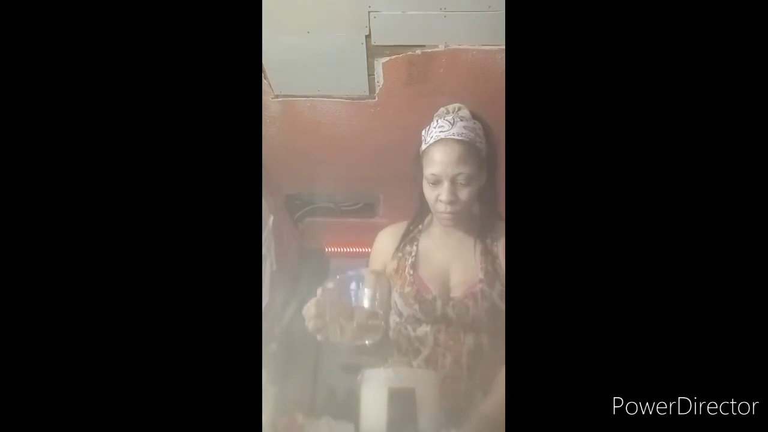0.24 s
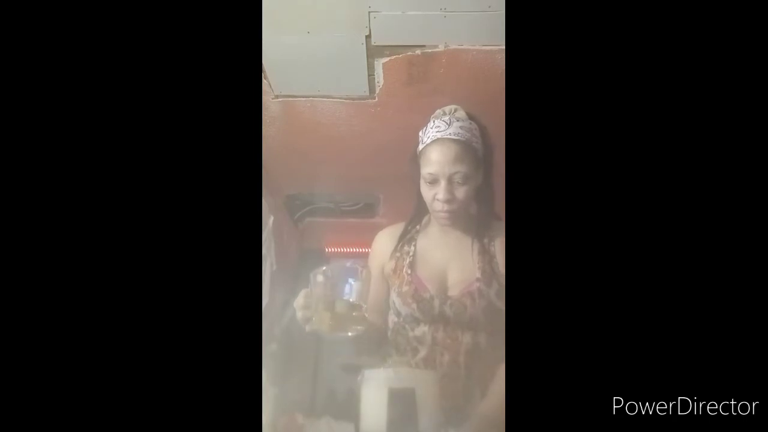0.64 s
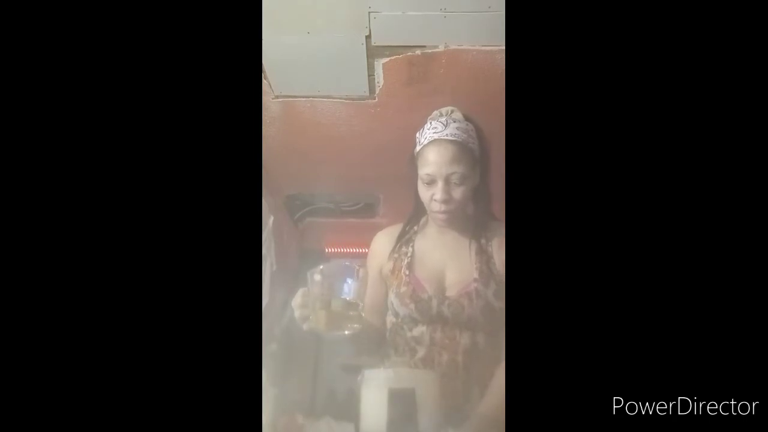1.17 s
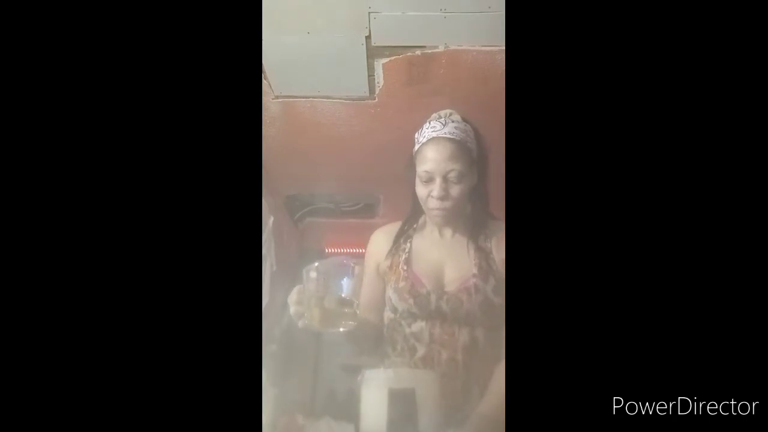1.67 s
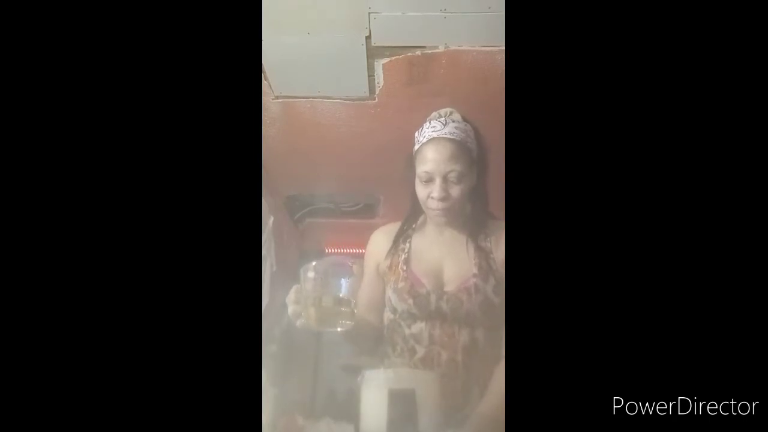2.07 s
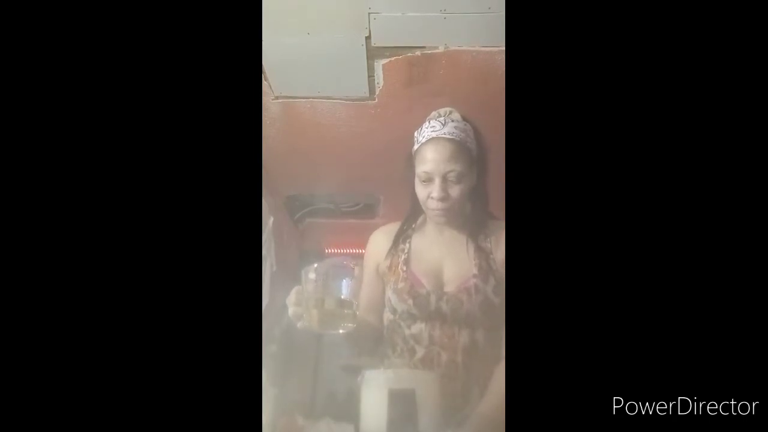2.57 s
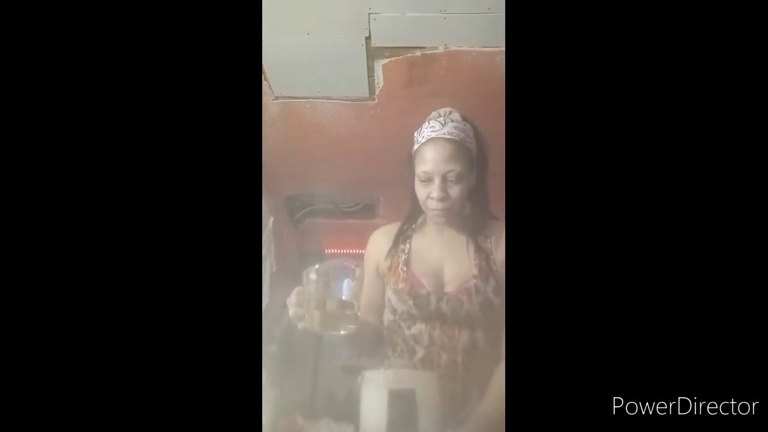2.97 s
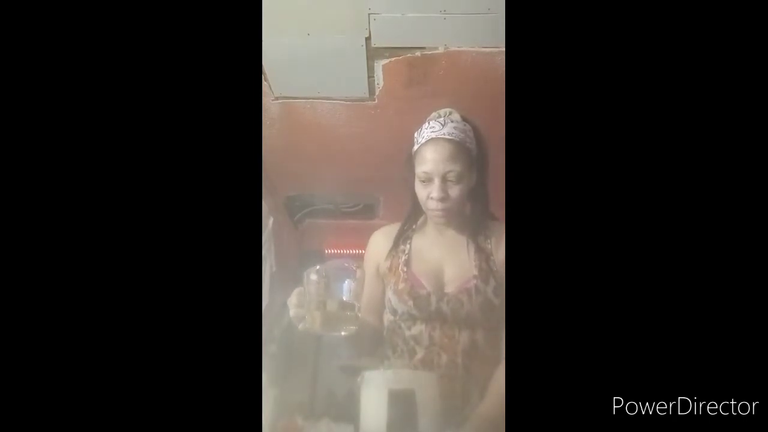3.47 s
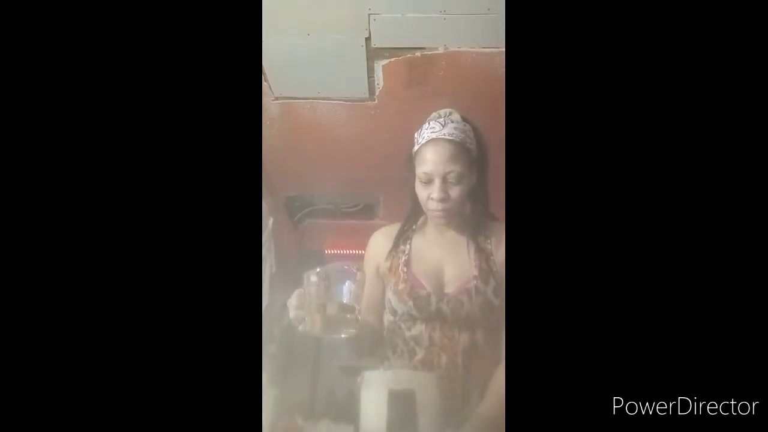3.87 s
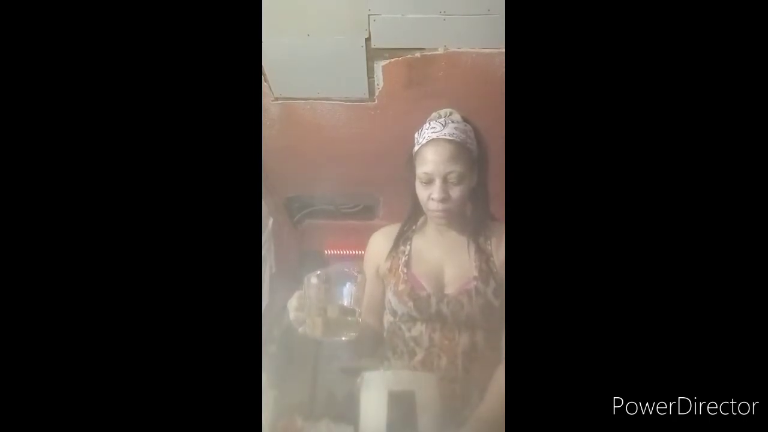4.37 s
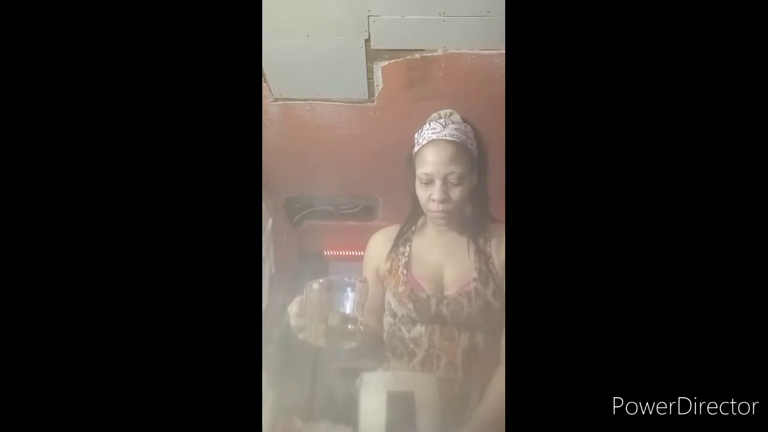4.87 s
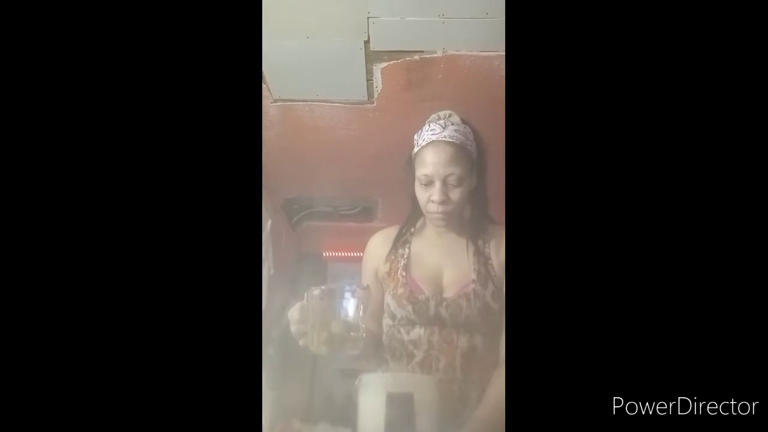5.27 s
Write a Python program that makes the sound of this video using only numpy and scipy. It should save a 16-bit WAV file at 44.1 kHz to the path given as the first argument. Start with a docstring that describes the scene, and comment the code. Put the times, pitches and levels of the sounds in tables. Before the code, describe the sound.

Close, dense kitchen appliance noise: a small electric motor grinding steadily, with a shrill buzzing whine and higher overtones, fast fluttering rattle from the housing and airy brush hiss above. The pitch sags a little under load midway, then climbs back. Little bass, only slight rumble and hum. No start or stop, no audible room echo, compressed phone-like microphone.

```python
"""Kitchen counter: a food processor runs steadily, close by.
Whine: gear tones locked to a mesh pitch that sags as the load rises, each split into mains sidebands.
Noise: coloured, throbbing noise for the housing rattle, the brush and fan hiss and the base rumble.
Low hum: slightly unsteady sines at fixed pitches, mains harmonics and another appliance.
Gain control then evens out the loudness."""
import sys
import numpy as np
from scipy import signal
from scipy.fft import rfft, irfft, next_fast_len
from scipy.io import wavfile
from scipy.ndimage import uniform_filter1d, map_coordinates

SR = 44100
rng = np.random.default_rng(int(sys.argv[2]) if len(sys.argv) > 2 else 0)


def transcribe(u):
    """Save the signal u as a 16-bit wav file named by the first command-line argument.

    u: samples, shape (n,) or (channels, n), limited to [-1, 1]; the rate is SR.
    q: integer samples, one column per channel.
    """
    v = np.clip(np.atleast_2d(u).T, -1, 1)
    q = np.round(v * 32767).astype(np.int16)
    wavfile.write(sys.argv[1], SR, q)


N = 244314
TIME_S = np.arange(N) / SR

# Gear mesh pitch, sagging under load, then recovering: start_s, mesh_hz
MESH_PITCH = [(0, 1934), (.2, 1932), (.45, 1940), (.65, 1936), (.8, 1925), (1, 1922), (1.2, 1912),
              (1.9, 1910), (2.3, 1900), (2.6, 1902), (3.2, 1895), (3.65, 1894.5), (4, 1906), (4.4, 1927),
              (4.8, 1921.5), (5.25, 1930), (5.54, 1926)]
# Gear train tones: mesh_multiple, strongest_sideband (mains steps from the multiple)
GEAR_TONES = [(3 / 41, 0), (.0995, 0), (.1692, 0), (.1745, 0), (.1956, 0), (27 / 41, 0), (33 / 41, 0),
              (.925, 0), (.9302, 0), (39 / 41, 1), (40 / 41, 0), (1, 0), (42 / 41, 0), (1.0701, 0),
              (73 / 41, 0), (1.9006, 0), (80 / 41, 0), (1.9651, 1), (81 / 41, 0), (2.0698, 0), (2.8953, 0),
              (121 / 41, 1), (3.052, 0), (3.8152, 0), (3.9097, 0)]
# Same tones: level_db (re mesh tone), sideband_loss_db (at one step; grows as the step squared)
GEAR_LEVELS = [(-35, 15), (-30, 15), (-26, 15), (-19, 20), (-34, 15), (-30, 8), (-18, 8), (-23, 14),
               (-10, 14), (-9, 1.5), (-19, 12), (0, 11), (-12, 13), (-19, 12), (-21, 10), (-17, 10),
               (-11, 4), (-14, 1.5), (-5.5, 2.2), (-18, 10), (-23, 3), (-21, 8), (-24, 4), (-18, 4),
               (-24, .8)]
# Whine level: start_s, level_db
WHINE_LEVEL = [(0, -21), (.6, -19), (1.2, -20.5), (2.4, -20.5), (3.8, -19.5), (4.2, -20.5), (5.54, -20.5)]
# Motor noise level: start_s, level_db
NOISE_LEVEL = [(0, -17.5), (.4, -17), (1.36, -16), (1.53, -16.5), (1.7, -14.5), (1.87, -16.5), (2.3, -15.5),
               (2.55, -16), (3, -15.5), (3.8, -15), (4.08, -17), (4.25, -15.5), (4.42, -17), (4.59, -14),
               (4.93, -16.5), (5.44, -16.5), (5.54, -15.5)]
# Housing rattle spectrum: pitch_hz, relative_density_db
RATTLE_SPECTRUM = [(650, -61), (1100, -36.5), (1280, -19.5), (1380, -22), (1500, -15.5), (1650, -15.5),
                   (1900, -1), (1970, -16), (2080, -8), (2320, -14.5), (2990, -7.5), (3240, -9),
                   (3830, -4.5), (4280, -15), (5200, -24), (6760, -48), (11400, -120)]
# Brush and fan hiss spectrum: pitch_hz, relative_density_db
HISS_SPECTRUM = [(2940, -29.5), (5000, -17), (5170, -13), (5580, -1), (6170, -8), (7040, 0.5), (7320, -1),
                 (7530, 0), (7860, -10), (8130, -14.5), (8440, -17.5), (9370, -12), (10700, -25),
                 (13200, -9.5), (15600, -21.5)]
# Base rumble spectrum: pitch_hz, relative_density_db
RUMBLE_SPECTRUM = [(12, -62), (20, -41), (87, -18.5), (173, -12), (244, -20.5), (326, -3.5), (401, -11.5),
                   (484, -13), (615, -7), (730, -19.5), (823, -12), (1050, -16.5), (1200, -15.5),
                   (1560, -27), (2640, -120)]
# Narrow peaks and dips of bowl and lid: center_hz, half_width_hz (to 1/e of the dB), gain_db
BOWL_PEAKS = [(1588, 25, -15), (1620, 32, 3.5), (1820, 17, -2), (2032, 21, 4), (2677, 37, -5),
              (3078, 43, 3.5), (3159, 44, -10.5), (3310, 57, 0.5), (4000, 40, 1.5), (4080, 40, 2),
              (4140, 37, -6), (4320, 34, -6), (5070, 60, 2.5), (5520, 30, -0.5), (5675, 43, 2.5),
              (6480, 47, 4.5), (7210, 38, 2), (7650, 39, -0.5), (11120, 340, 4.5), (14300, 300, -7)]
# Low hum, mains harmonics and another appliance: pitch_hz, level_db
LOW_HUM = [(54.5, -61.5), (119.9, -59.5), (163.5, -57), (179.7, -47), (218.0, -57.5), (239.7, -55),
           (299.6, -42), (359.7, -52.5), (419.7, -53)]

MAINS_HZ, TOP_HZ, BASS_CUT_HZ = 59.9, 15490, 33
BLADE_TEETH = 41  # mesh cycles per blade shaft turn
SIDEBANDS = np.arange(-3, 4)  # mains steps from the strongest
HISS_DB, RUMBLE_DB = -3.5, -20.5  # re rattle


def amp(db):
    """Amplitude gain of a level in dB."""
    return 10 ** (np.asarray(db) / 20)


def unit(x):
    """Scale x to rms 1."""
    return x / np.sqrt(np.mean(x ** 2) + 1e-20)


def curve(rows):
    """Interpolate a (start_s, value) table to one value per sample."""
    start_s, value = np.transpose(rows)
    return np.interp(TIME_S, start_s, value)


def wobble(rate_hz):
    """Random curve: straight lines between normal random knots, rate_hz knots a second."""
    knots = rng.standard_normal(int(N * rate_hz / SR) + 4)
    return np.interp(TIME_S * rate_hz, np.arange(len(knots)), knots)


def filtered(x, response):
    """Multiply the spectrum of x by response(hz), at zero phase."""
    size = next_fast_len(N + 8192)
    spectrum = rfft(x, size) * response(np.fft.rfftfreq(size, 1 / SR))
    return irfft(spectrum, size)[..., :N]


def whine(mesh_turns, whine_db):
    """Gear tones share the mesh pitch and tremble; each drifts, swells and carries mains sidebands."""
    tones = np.zeros(N)
    tremble_rad = 0.18 * wobble(12)
    mains_steps = np.exp(2j * np.pi * MAINS_HZ * np.outer(SIDEBANDS, TIME_S))
    for (multiple, strongest), (level_db, loss_db) in zip(GEAR_TONES, GEAR_LEVELS):
        phase_rad = 2 * np.pi * multiple * mesh_turns
        phase_rad += multiple * (tremble_rad + 0.33 * wobble(9))
        phase_rad += 2 * np.pi * MAINS_HZ * strongest * TIME_S
        start_phases = np.exp(2j * np.pi * rng.random(len(SIDEBANDS)))
        sidebands = amp(level_db - loss_db * SIDEBANDS ** 2) * start_phases @ mains_steps
        swell_db = 1.12 * wobble(5) + 0.5 * wobble(30)
        tones += amp(swell_db) * np.real(sidebands * np.exp(1j * phase_rad))
    return np.sqrt(2) * amp(whine_db) * tones


def blade_flutter(mesh_turns):
    """Load pulses at the blade shaft rate and its next two harmonics."""
    blade_rad = 2 * np.pi * mesh_turns / BLADE_TEETH
    return np.cos(blade_rad) + 1.08 * np.cos(2 * blade_rad) + 0.91 * np.cos(3 * blade_rad)


def motor_noise(flutter):
    """Rattle and hiss share the same fast random loudness flutter and pass the bowl; rumble bypasses it."""
    mains_rad = 2 * np.pi * MAINS_HZ * TIME_S
    mains_throb = np.cos(2 * mains_rad) + 0.49 * np.cos(mains_rad)
    shared_random = wobble(70) + 0.26 * wobble(150) + 0.64 * wobble(400)
    housing = rattle(mains_throb, flutter, shared_random)
    air = hiss(mains_throb, flutter, shared_random)
    mix = bowl(housing + amp(HISS_DB) * air, ragged_db=1.18) + amp(RUMBLE_DB) * rumble(mains_throb)
    return amp(curve(NOISE_LEVEL)) * mix


def rattle(mains_throb, flutter, shared_random):
    """Gear teeth shake the housing: noise driven by blade flutter, random flutter and mains."""
    gain_db = 0.32 * mains_throb + 0.76 * flutter + shared_random
    return noise(RATTLE_SPECTRUM, 0.75, amp(gain_db))


def hiss(mains_throb, flutter, shared_random):
    """Brushes and fan: high noise throbbing with the mains, with a fast grain of its own."""
    gain_db = 1.1 * mains_throb + 0.11 * flutter + 0.67 * shared_random + 0.86 * wobble(1500)
    return noise(HISS_SPECTRUM, 0.7, amp(gain_db))


def rumble(mains_throb):
    """Base: low noise throbbing with the mains and swelling by itself."""
    gain_db = 1.2 * mains_throb + 2 * wobble(5.85)
    return noise(RUMBLE_SPECTRUM, 0.55, amp(gain_db))


def noise(spectrum, patchy_db, gain):
    """White noise, patchy in time and frequency, shaken by gain, then coloured; rms 1."""
    white = signal.stft(rng.standard_normal(N + 512), nperseg=512)[2]
    patches = rng.standard_normal(white.shape)
    for axis in (0, 1):
        patches = uniform_filter1d(patches, size=8, axis=axis)
    patchy = signal.istft(white * amp(patchy_db * unit(patches)), nperseg=512)[1][:N]
    pitch_hz, density_db = np.transpose(spectrum)

    def colour(hz):
        return amp(np.interp(np.log(hz + 1), np.log(pitch_hz + 1), density_db))

    return unit(filtered(patchy * gain, colour))


def bowl(x, ragged_db):
    """Bowl and lid peaks and dips, plus a random, finely uneven colour over pitch."""
    knots = rng.standard_normal(600)
    knots_hz = np.linspace(0, SR / 2, len(knots))

    def response(hz):
        gain_db = ragged_db * np.interp(hz, knots_hz, knots)
        for center_hz, half_width_hz, peak_db in BOWL_PEAKS:
            gain_db += peak_db * np.exp(-((hz - center_hz) / half_width_hz) ** 2)
        return amp(gain_db)

    return filtered(x, response)


def hum():
    """Mains harmonics and another appliance: fixed low sines, slightly unsteady in level and phase."""
    total = np.zeros(N)
    for pitch_hz, level_db in LOW_HUM:
        gain = np.sqrt(2) * amp(level_db + 0.7 * wobble(5.75))
        phase_rad = 0.19 * wobble(5) + rng.uniform(0, 2 * np.pi)
        total += gain * np.sin(2 * np.pi * pitch_hz * TIME_S + phase_rad)
    return total


def scene():
    """Processor, close and dry, over the low hum; whine, rattle and hiss share the blade flutter."""
    mesh_turns = np.cumsum(curve(MESH_PITCH)) / SR
    flutter = blade_flutter(mesh_turns)
    gears = amp(0.98 * flutter) * whine(mesh_turns, curve(WHINE_LEVEL))
    return (gears + motor_noise(flutter) + hum())[None]


def record(dry):
    """Fast gain control, rounded peaks, deep bass cut, band limit."""
    power = dry ** 2
    for _ in range(2):
        power = uniform_filter1d(power, size=1500, mode="reflect")
    levelled = dry * (np.abs(power) / amp(-24.5)) ** -.22
    rounded = levelled / (1 + np.abs(levelled) ** 8) ** (1 / 8)
    return filtered(rounded, lambda hz: (hz < TOP_HZ) * hz ** 2 / (hz ** 2 + BASS_CUT_HZ ** 2))


dry = scene()
out = record(dry)
transcribe(out)
```